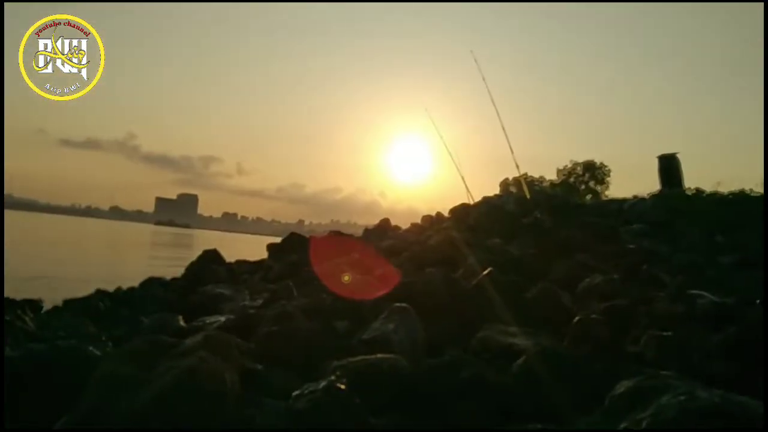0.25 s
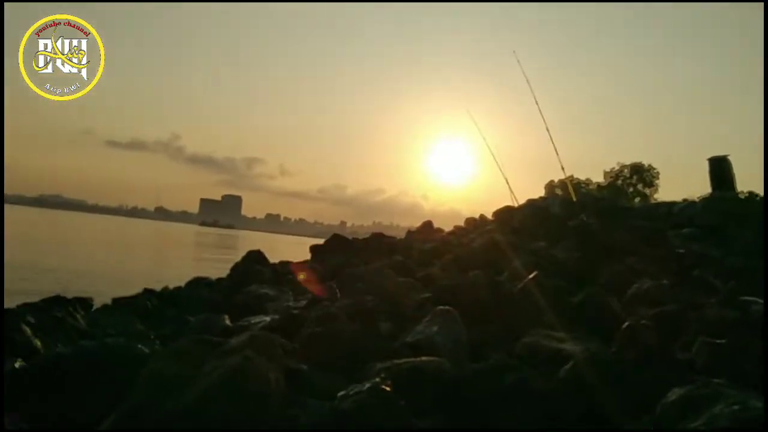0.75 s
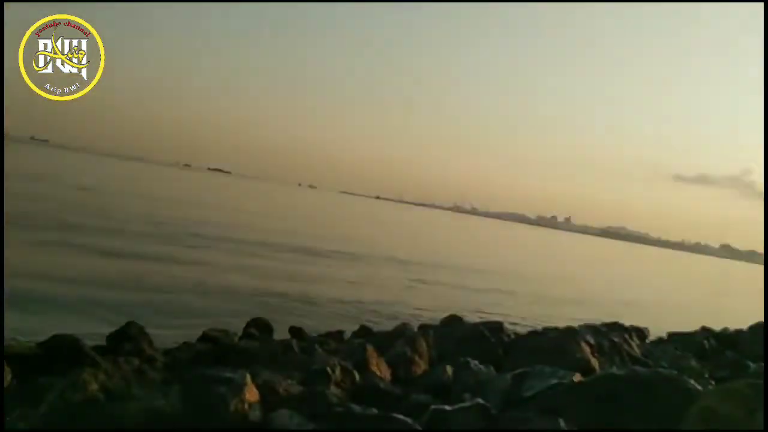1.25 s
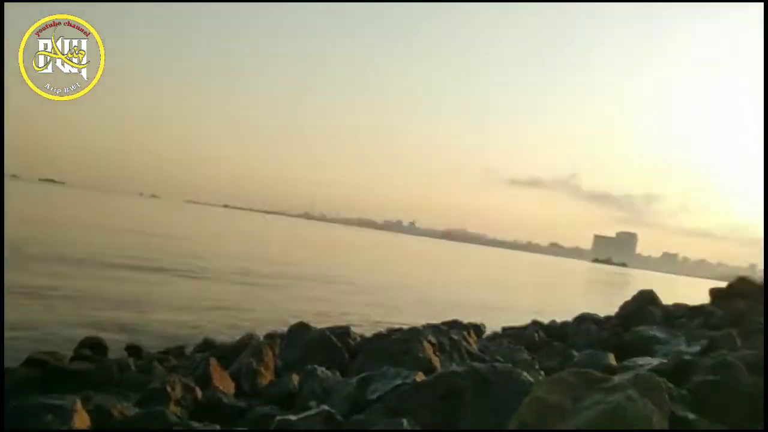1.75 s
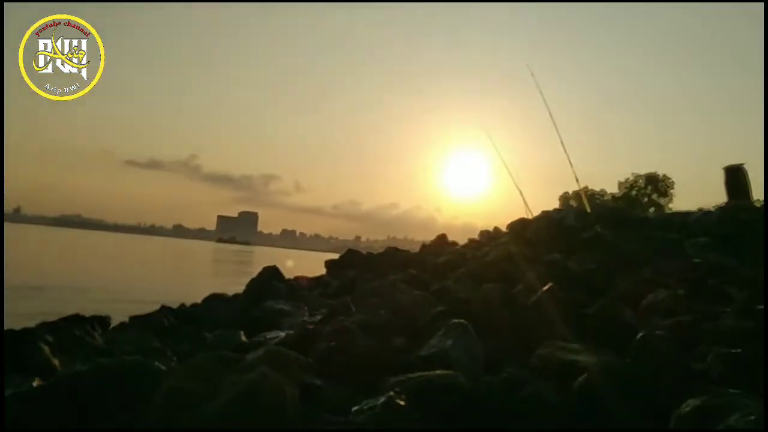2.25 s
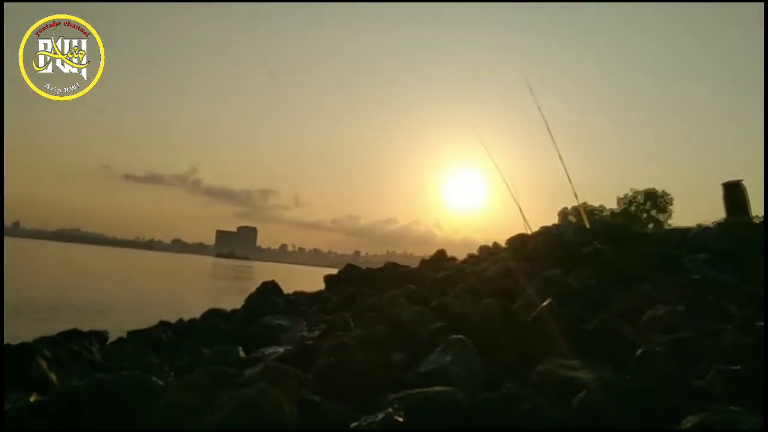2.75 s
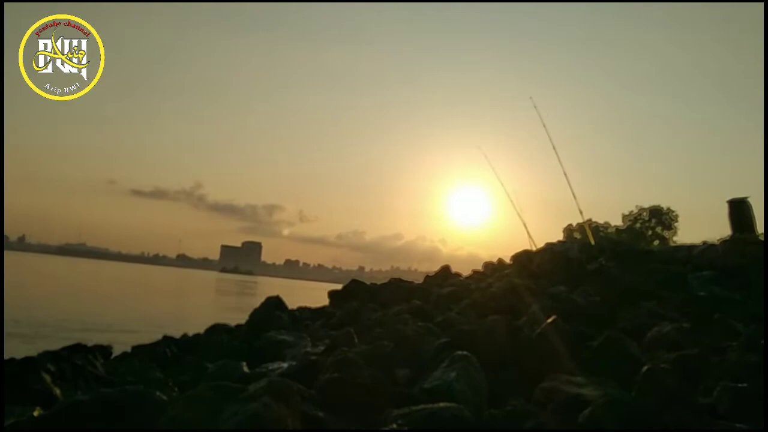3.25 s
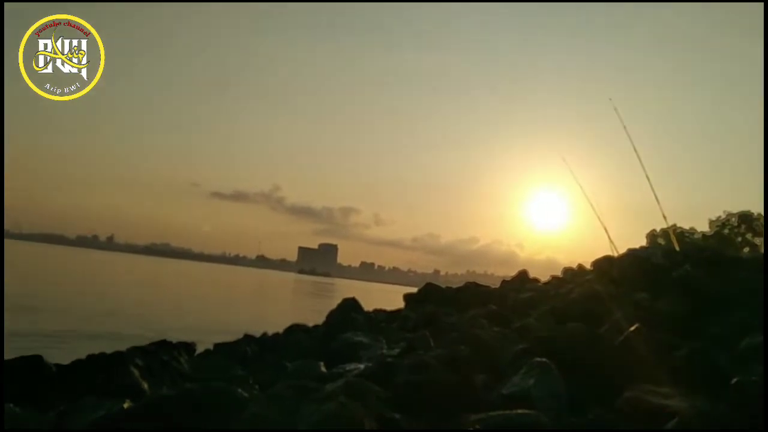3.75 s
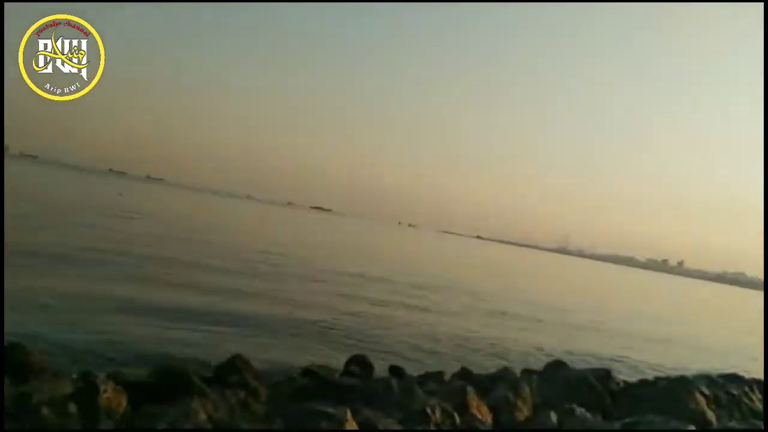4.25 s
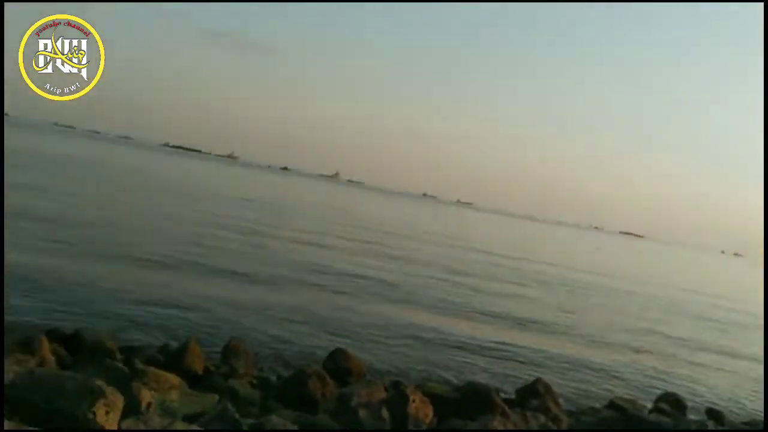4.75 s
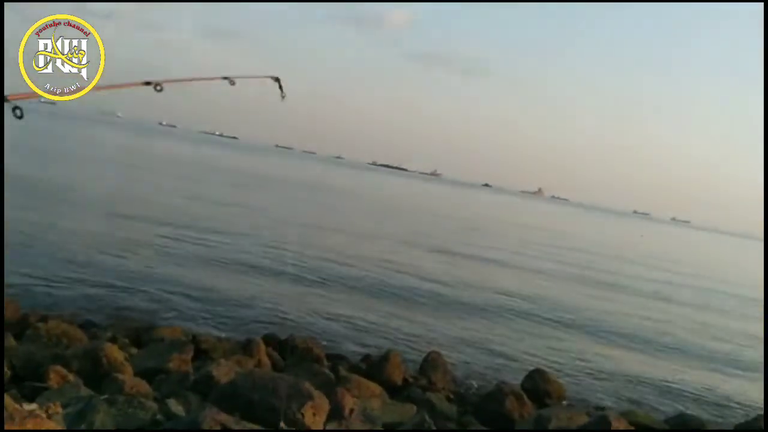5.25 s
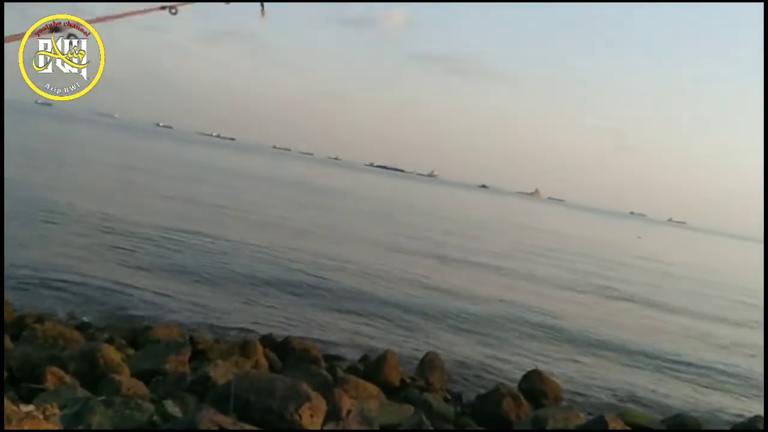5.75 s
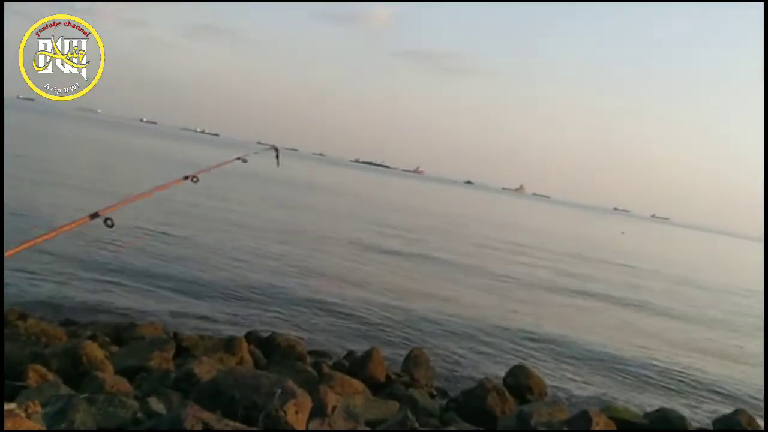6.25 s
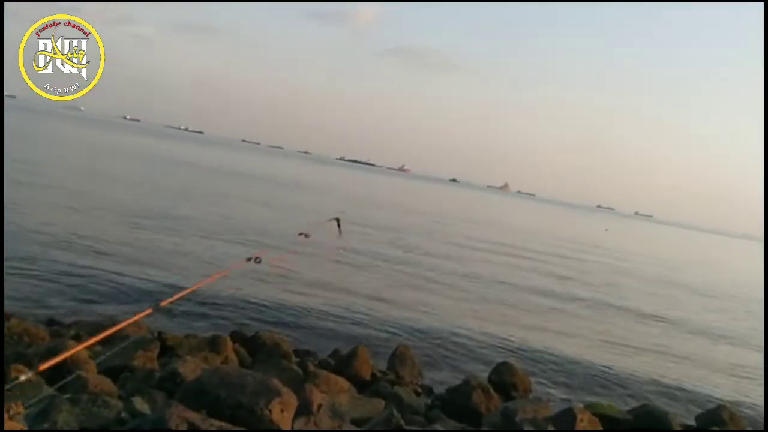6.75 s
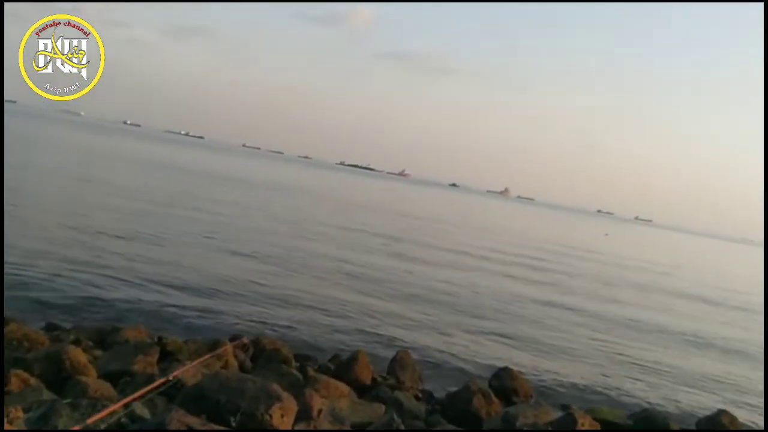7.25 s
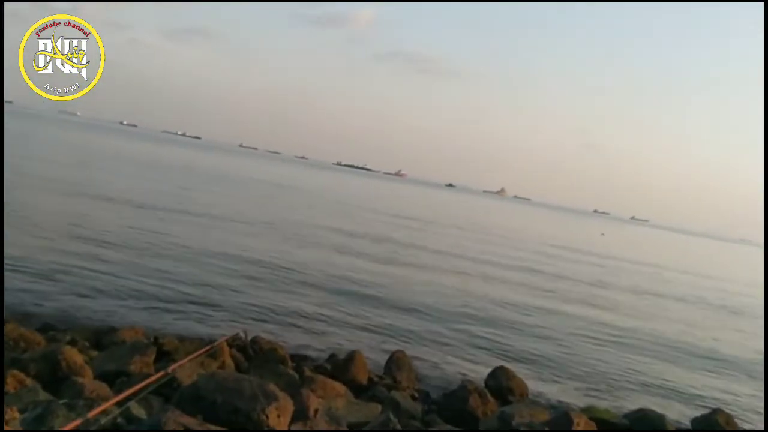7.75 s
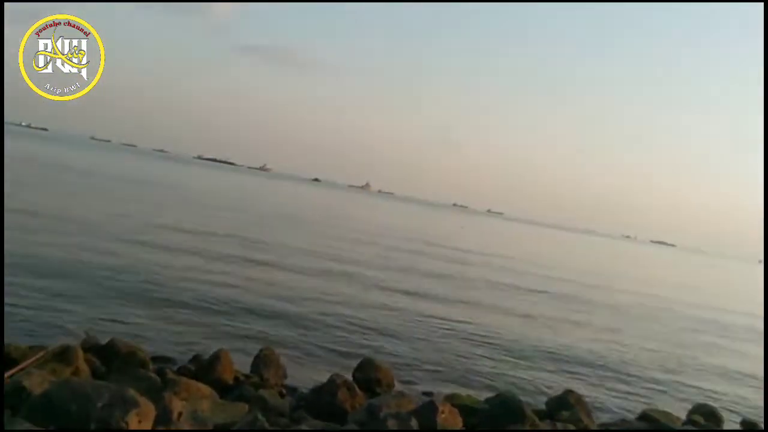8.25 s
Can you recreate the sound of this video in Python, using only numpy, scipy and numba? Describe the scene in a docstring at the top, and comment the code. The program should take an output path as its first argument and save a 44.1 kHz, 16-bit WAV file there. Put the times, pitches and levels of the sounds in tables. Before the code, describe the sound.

Gentle water plops and gurgles between rocks, foam hissing in a stronger surge late on, with soft wind rumble and distant engine hum beneath.

```python
"""Small waves on a boulder shore

Waves slap the stones as decaying bursts of noise and tone, with single air pockets and small spills as ringing bubbles.
Water gulps in the gaps through a moving resonance; trickles and foam are swarms of bubbles over coloured noise.
The boulders add a short, dense echo to all of the water but the foam.
A light breeze rumbles on the microphone as low noise, over ship engines humming far off as two low tones."""
import sys
import numpy as np
from scipy import signal
from scipy.fft import irfft
from scipy.io import wavfile
from scipy.ndimage import uniform_filter1d
from numba import njit

SR = 44100
rng = np.random.default_rng(int(sys.argv[2]) if len(sys.argv) > 2 else 0)


def digitize_waveform(pressure):
    """Quantize a signal to 16-bit integers and store it at the path in sys.argv[1].

    Rows of a 2-D input are taken as channels; values are limited to [-1, 1].
    """
    field = np.atleast_2d(pressure).T
    bounded = np.clip(field, -1, 1)
    quanta = np.round(bounded * 32767).astype(np.int16)
    wavfile.write(sys.argv[1], SR, quanta)


N = 375291
TIME = np.arange(N) / SR


def gain_of(db):
    """Level law: 20 dB is a factor of ten in amplitude."""
    return 10 ** (np.asarray(db) / 20)


def evened(x):
    """Power normalisation: scales to rms 1."""
    return x / np.sqrt(np.mean(x ** 2) + 1e-20)


def curve(rows, index=1):
    """Linear interpolation: one column of a table, joined by straight lines in time."""
    rows = np.asarray(rows)
    return np.interp(TIME, rows[:, 0], rows[:, index])


def add(mix, s, sound):
    """Superposition: sums a sound into the mix at time s."""
    part = mix[max(round(s * SR), 0):][:len(sound)]
    part += sound[:len(part)]


def played(rows, voice):
    """Superposition of events: every row of a table, sounded at its time."""
    out = np.zeros(N)
    for s, *event in rows:
        add(out, s, voice(*event))
    return out


def wander(per_s):
    """Random modulation: chance values, per_s a second, joined by straight lines, at rms 1."""
    knots = rng.standard_normal(4096)
    return evened(np.interp(TIME * per_s, np.arange(len(knots)), knots))


def coloured(x, colour, size=8192):
    """Minimum-phase filtering: shapes the spectrum without ringing ahead of a blow, at rms 1."""
    hz, db = np.transpose(colour)
    # the response falls by 50 dB towards points far beyond both ends
    hz = np.r_[hz[0] / 6, hz, hz[-1] * 6]
    db = np.r_[db[0] - 50, db, db[-1] - 50]
    bins_hz = abs(np.fft.fftfreq(size, 1 / SR))
    shape_db = np.interp(np.log(bins_hz + 1), np.log(hz), db)
    # the Hilbert transform of the log gain gives the minimum phase
    log_response = np.conj(signal.hilbert(np.log(gain_of(shape_db))))
    response = np.exp(log_response)[:size // 2 + 1]
    return evened(signal.oaconvolve(x, irfft(response))[:len(x)])


def resonate(x, hz, width_hz):
    """Heterodyne resonance: shifts the moving pitch to zero, smooths, and shifts back, at rms 1."""
    turn = np.exp(2j * np.pi * np.cumsum(hz) / SR)
    r = np.exp(-np.pi * width_hz / SR)
    smoothed = signal.lfilter([1], [1, -2 * r, r * r], x / turn)
    return evened((turn * smoothed).real)


@njit
def ring_bubbles(count, births, steps, lives, sizes, rise):
    """Bubble oscillation: each air pocket rings, dies over its life, and rises in pitch near the surface."""
    # steps: cycles per sample; lives: decay constants in samples; rise: share of the pitch per life
    out = np.zeros(count)
    for k in range(len(births)):
        swing = sizes[k] + 0j
        turn = np.exp(2j * np.pi * steps[k] - 1 / lives[k])
        quicken = np.exp(2j * np.pi * steps[k] * rise / lives[k])
        for i in range(min(int(4 * lives[k]), count - births[k])):
            # the first half cycle fades in
            out[births[k] + i] += swing.imag * min(2 * steps[k] * i, 1.)
            swing *= turn
            turn *= quicken
    return out


def bubbles(lo_hz, hi_hz, per_s, cycles, rise, spread_db):
    """Random births: a swarm with pitches even on a log scale, many bubbles faint and a few strong."""
    births = np.flatnonzero(rng.random(N) < per_s / SR)
    pitch, damping, chance = rng.random((N, 3), dtype=np.float32)[births].T.astype(float)
    hz = lo_hz * (hi_hz / lo_hz) ** pitch
    lives = cycles * (.5 + damping) * SR / hz
    excess_db = spread_db * np.minimum(-np.log(1 - chance), 4)
    sizes = gain_of(excess_db) * np.sqrt(hz / lives)
    swarm = ring_bubbles(N, births, hz / SR, lives, sizes, float(rise))
    # a denser swarm gains in number but not in power
    return evened(swarm / np.sqrt(per_s))


def water(grains, colour, rush_db, flicker_db, flicker_per_s):
    """Dense superposition: bubbles over the noise of countless tiny ones, arriving in spurts."""
    mix = grains + gain_of(rush_db) * rng.standard_normal(N)
    spurts = gain_of(flicker_db * wander(flicker_per_s))
    return evened(coloured(mix, colour) * spurts)


def patchy(x, depth_db, size=512):
    """Time-frequency modulation: water finds ever new paths, so bands of its sound come and go."""
    z = signal.stft(x, nperseg=size)[2]
    field = uniform_filter1d(rng.standard_normal(z.shape), size=9, axis=0)
    field = evened(uniform_filter1d(field, size=8, axis=1))
    return evened(signal.istft(z * gain_of(depth_db * field), nperseg=size)[1][:N])


def swells(events, rise_s, fall_db_per_s):
    """Power addition: each push of water rises, holds for its length, and drains away."""
    power = np.zeros(N)
    for start, length, level_db in events:
        age = TIME - start
        fall_db = fall_db_per_s * np.maximum(age - length, 0)
        power += (np.clip(age / rise_s, 0, 1) * gain_of(level_db - fall_db)) ** 2
    return power


# wind noise spectrum: (frequency [Hz], level per Hz [dB])
BREEZE_SPECTRUM = [(15, -30), (25, -14), (40, -13.5), (55, -12), (72, 0.5), (90, 4.5), (115, -3),
                   (150, -3.5), (180, -15), (230, -24), (320, -36), (600, -46.5)]
# slow level of the wind noise: (time [s], level [dB])
BREEZE_LEVEL = [(0.0, -42.5), (0.3, -54.5), (0.38, -39), (0.47, -50), (0.85, -60.5), (1.2, -48.5),
                (2.0, -48), (2.5, -48), (2.8, -61.5), (3.02, -56), (3.15, -63.5), (3.55, -49.5),
                (4.05, -53.5), (4.25, -51), (4.4, -63), (4.94, -50), (5.16, -66), (5.28, -45), (5.58, -63),
                (5.75, -46), (5.9, -54), (6.64, -47), (7.35, -63), (7.67, -53), (7.82, -59), (7.97, -51),
                (8.1, -61.5), (8.3, -51)]


def breeze():
    """Wind noise: low noise evened over about 80 ms, so that the gusts alone set its slow level."""
    wind = coloured(rng.standard_normal(N), BREEZE_SPECTRUM)
    wind /= np.sqrt(uniform_filter1d(wind ** 2, size=3500))
    return gain_of(curve(BREEZE_LEVEL)) * wind


# partials of the engine hum: (frequency [Hz], relative level [dB])
HUM_PARTIALS = [(74.8, -4), (149.6, -12)]
# swelling and fading of the hum: (time [s], level [dB])
HUM_SWELL = [(0.0, -43.5), (0.5, -50), (0.85, -66), (1.2, -46), (2.25, -42), (3.05, -72), (3.6, -47.5),
             (4.5, -59), (6.6, -47.5), (7.3, -69.5), (8.5, -56)]


def engine_hum():
    """Harmonic tones: two partials share a slow pitch drift, while each flutters in level."""
    drift = np.cumsum(.006 * wander(5)) / SR  # 0.6 % of the pitch, rms
    hum = np.zeros(N)
    for hz, db in HUM_PARTIALS:
        level = gain_of(db - 0.5 + 3.6 * wander(7.0))
        hum += level * np.sqrt(2) * np.sin(2 * np.pi * hz * (TIME + drift))
    return gain_of(curve(HUM_SWELL)) * hum


# small crests breaking into foam: (start [s], length [s], level [dB])
BREAKING_CRESTS = [(0.06, 0.025, -52), (1.16, 0.082, -60.5), (1.44, 0.052, -50.5), (4.88, 0.14, -46),
                   (5.85, 0.066, -51.5), (6.0, 0.045, -40), (6.12, 0.027, -38), (6.42, 0.14, -43),
                   (7.11, 0.036, -47), (7.3, 0.044, -45.5), (7.82, 0.056, -50), (7.96, 0.074, -48.5)]
CREST_RISE_S, CREST_FALL_DB_PER_S = 0.02, 188.5
SWAY_DB, SWAY_PER_S = 0.5, 12  # ripples make a thin wash come and go


def with_crests(wash_db, crest_db):
    """Power addition of levels: the slow wash in dB with the breaking crests on top."""
    crests = swells(BREAKING_CRESTS, CREST_RISE_S, CREST_FALL_DB_PER_S)
    thin = 1 - gain_of(wash_db - wash_db.max())
    wash = gain_of(wash_db + SWAY_DB * thin * wander(SWAY_PER_S))
    return 10 * np.log10(wash ** 2 + gain_of(crest_db) ** 2 * crests)


def spatter(per_s, decay, spread_db):
    """Shot noise: falling drops at chance times, each a decaying pulse (decay in s) of one envelope."""
    excess_db = spread_db * np.minimum(rng.exponential(1, N), 2.5)
    drops = (rng.random(N) < per_s / SR) * gain_of(excess_db)
    return evened(signal.lfilter([1], [1, -np.exp(-1 / (decay * SR))], drops))


DRIPS_PER_S, DRIPS_DB = 26, -7  # level relative to thin foam


def drips():
    """Impact noise: single drops land on wet stone, each a dry tick over the whole treble."""
    excess_db = 4 * np.minimum(rng.exponential(1, N), 2.6)
    landings = (rng.random(N) < DRIPS_PER_S / SR) * gain_of(excess_db)
    burst = signal.lfilter([1], [1, -np.exp(-1 / (.0005 * SR))], landings)  # 0.5 ms decay
    return coloured(burst * rng.standard_normal(N), FOAM_SPECTRUM)


# slow wash of the swell over the stones: (time [s], foam level [dB], trickle level [dB])
SWELL_WASH = [(0.0, -57, -66), (0.2, -53.5, -58.5), (0.55, -61, -60.5), (0.8, -74, -60), (0.93, -69.5, -71),
              (1.08, -63.5, -69), (1.38, -60.5, -67.5), (1.75, -53.5, -55.5), (2.15, -49.5, -55),
              (2.47, -58.5, -66), (2.78, -66, -66), (2.88, -58.5, -64.5), (3.08, -65.5, -60),
              (3.28, -60, -61.5), (3.58, -62.5, -66), (3.95, -59, -57), (4.45, -53.5, -59.5),
              (4.7, -53.5, -56.5), (5.25, -49.5, -54), (5.7, -51.5, -53), (5.96, -62, -58),
              (6.3, -45, -55.5), (6.63, -34, -45.5), (6.9, -43.5, -53.5), (7.19, -41, -50.5),
              (7.26, -49, -56.5), (7.48, -52.5, -55.5), (7.62, -58, -63), (8.05, -51.5, -50.5),
              (8.25, -59, -57), (8.5, -78, -67)]
# foam spectrum: (frequency [Hz], level per Hz [dB])
FOAM_SPECTRUM = [(1200, -5.5), (2400, -3), (3400, -2), (5000, -3), (6700, -2.5), (7900, 2.5), (8700, -5),
                 (10000, -10.5), (13000, -19), (16000, -15)]


def foam():
    """Bubble bursting: separate ticks when thin, a bright dense hiss as a wave breaks."""
    level_db = with_crests(curve(SWELL_WASH), crest_db=2.5)
    surge = gain_of(level_db - level_db.max())
    ticks = bubbles(1800, 14000, per_s=1400 + 14000 * surge, cycles=4, rise=.01, spread_db=3)
    fizz = water(ticks, FOAM_SPECTRUM, rush_db=-3, flicker_db=1.1, flicker_per_s=70)
    # single drops stand out only while the foam is thin
    share = 0.3 * (1 - surge) ** 2
    fizz *= np.sqrt(1 - share + share * spatter(per_s=64, decay=0.006, spread_db=2.5) ** 2)
    fizz = patchy(fizz + gain_of(DRIPS_DB) * (1 - surge) ** 4 * drips(), depth_db=1.6)
    # the top treble above 8.7 kHz dulls as the level falls
    below_top = signal.sosfiltfilt(signal.butter(12, 8700, fs=SR, output="sos"), fizz)
    top_gain = np.clip((level_db + 67) / 12.5, .35, 1)
    return gain_of(level_db + 1.23) * (below_top + top_gain * (fizz - below_top))


# trickle spectrum: (frequency [Hz], level per Hz [dB])
TRICKLE_SPECTRUM = [(400, -23.5), (600, -9.5), (750, 7), (1100, 6.5), (1600, 5.5), (2300, 1.5), (3200, -5),
                    (5000, -37.5)]
RUNOFF_DB = -9  # crests in the trickle, relative to their table


def trickle():
    """Bubble entrainment: runoff plinks with more bubbles, and larger ones, as the flow grows."""
    level_db = with_crests(curve(SWELL_WASH, index=2), crest_db=RUNOFF_DB)
    flow = gain_of(level_db - level_db.max())
    plinks = bubbles(620, 3800, per_s=260 + 4500 * flow, cycles=7, rise=.04, spread_db=2.7)
    run = water(plinks, TRICKLE_SPECTRUM, rush_db=-8, flicker_db=1.3, flicker_per_s=30)
    run = patchy(run, depth_db=1.5)
    large = signal.sosfiltfilt(signal.butter(6, 950, fs=SR, output="sos"), run)
    # a weak flow traps few large bubbles
    lacking = np.clip(0.85 - 2.4 * flow + 0.29 * wander(4.9), 0, .93)
    return gain_of(level_db - 0.16) * (run - lacking * large)


# gurgle spectrum: (frequency [Hz], level per Hz [dB])
GURGLE_SPECTRUM = [(130, -5), (230, 2), (350, -7), (480, -1), (680, 0), (950, -54.5)]
# the gap that the water fills: (time [s], pitch of its air [Hz])
GAP_PITCH = [(1.5, 470), (1.7, 386), (1.95, 506), (2.3, 485), (2.6, 630), (3.6, 660), (4.8, 454),
             (5.62, 342), (5.74, 630), (6.15, 417), (6.77, 356), (7.1, 458), (8.05, 397)]
# water filling a gap between boulders: (start [s], length [s], level [dB])
GAP_GULPS = [(1.46, 0.22, -65.5), (1.66, 0.046, -48.5), (1.8, 0.25, -57), (2.11, 0.13, -54),
             (2.86, 0.057, -66), (4.9, 0.11, -44.5), (5.24, 0.45, -58.5), (5.72, 0.072, -60.5),
             (6.02, 0.041, -48.5), (6.13, 0.029, -44), (6.2, 0.2, -62), (6.41, 0.2, -48),
             (6.64, 0.11, -43.5), (6.83, 0.093, -57.5), (7.08, 0.097, -48.5), (7.982, 0.03, -40),
             (8.11, 0.048, -48)]
GULP_RISE_S, GULP_FALL_DB_PER_S = 0.0034, 151
SLOSH_DB = -19.5  # gurgle between gulps, relative to the slow trickle wash


def gurgle():
    """Cavity resonance: large air pockets gulp between the boulders, and the gap that holds them rings."""
    pockets = bubbles(200, 750, per_s=700, cycles=6, rise=.04, spread_db=1.3)
    churn = water(pockets, GURGLE_SPECTRUM, rush_db=-4, flicker_db=1.0, flicker_per_s=25)
    hollow = evened(resonate(churn, curve(GAP_PITCH), width_hz=172) + 1.32 * churn)
    slosh = gain_of(curve(SWELL_WASH, index=2) + SLOSH_DB)
    gulps = swells(GAP_GULPS, GULP_RISE_S, GULP_FALL_DB_PER_S)
    return np.sqrt(slosh ** 2 + gulps) * hollow


# small spills over single stones: (start [s], length [s], level [dB], pitch [Hz])
STONE_SPILLS = [(0.6, 0.049, -65, 786), (0.73, 0.038, -64, 790), (3.185, 0.04, -55.5, 1330),
                (3.84, 0.1, -60.5, 877), (4.14, 0.073, -63.5, 764), (5.595, 0.044, -55.5, 706),
                (7.2, 0.02, -43, 960), (7.808, 0.024, -49, 930), (8.11, 0.031, -45, 1100)]
SPILL_SCATTER, SPILL_CYCLES = 0.151, 7  # spread of the bubbles' log pitch, and their life in cycles


def spill(length, level_db, hz, count=36):
    """Bubble train: a tongue of water tips over a stone in a short run of bubbles of about one size."""
    chance, scatter = rng.random((2, count)), rng.standard_normal(count)
    place = (np.arange(count) + chance[0]) / count
    births = (place * min(length, .25) * SR).astype(int)
    steps = hz * np.exp(SPILL_SCATTER * scatter) / SR
    sizes = np.sin(np.pi * place) ** .5 * (.5 + chance[1])
    run = ring_bubbles(SR // 2, births, steps, SPILL_CYCLES / steps, sizes, .04)
    # the level holds over the spill's own length
    return gain_of(level_db) * evened(run) * np.sqrt(length * SR / len(run))


# single large air pockets: (time [s], ring time [s], level [dB], pitch [Hz])
AIR_POCKETS = [(1.492, 0.0057, -55.5, 472), (1.651, 0.0048, -37, 715), (3.081, 0.0025, -52, 995),
               (3.22, .011, -51, 251), (5.234, 0.0077, -55.5, 450), (5.333, 0.014, -53, 364),
               (5.528, 0.009, -46.5, 343), (5.604, 0.011, -46, 275), (6.441, 0.0084, -35.5, 276),
               (6.681, 0.0073, -35, 328), (6.818, 0.0072, -43.5, 467), (7.742, 0.013, -54, 293),
               (8.026, 0.011, -35, 293)]
PLOP_RISE, PLOP_WOBBLE = 0.03, 0.094  # shares of the pitch


def plop(ring_s, level_db, hz):
    """Damped oscillation: one large air pocket swells softly, wobbles and dies, rising a little in pitch."""
    t = np.arange(8192) / SR
    age = t / max(ring_s, .001)
    wobble = np.interp(age, np.arange(256), rng.standard_normal(256))
    pitch = hz * (1 + PLOP_RISE * np.tanh((age - 1) / 2) + PLOP_WOBBLE * wobble)
    swell = age * np.exp(1 - age)
    return gain_of(level_db) * np.sqrt(2) * swell * np.sin(2 * np.pi * np.cumsum(pitch) / SR)


# water striking stone, the spray relative to the level:
# (time [s], length [s], level [dB], pitch of the trapped air [Hz], spray [dB])
STONE_SLAPS = [(0.035, 0.0018, -45, 3430, 0), (0.603, 0.024, -53.5, 1430, -3.5),
               (0.798, 0.0032, -52, 1790, -26.5), (1.158, 0.0031, -51, 1850, 0),
               (1.315, 0.0016, -56.5, 5300, 7), (1.651, 0.0073, -40.5, 1310, 0.5),
               (1.651, 0.0017, -35.5, 4300, -12), (1.668, 0.013, -45, 507, -15),
               (1.69, 0.006, -35.5, 420, -25), (1.691, 0.003, -40.5, 2400, -19),
               (1.788, 0.0095, -41.5, 385, -21), (2.145, 0.004, -46.5, 2250, 2),
               (3.49, 0.0025, -45.5, 1750, 1.5), (3.963, 0.0057, -46.5, 2250, -0.5),
               (4.792, 0.0056, -42, 2260, -28), (4.891, 0.0038, -37.5, 2220, -29),
               (4.909, 0.011, -30, 326, -10), (4.934, 0.028, -41, 182, 1.5), (4.976, 0.014, -34, 314, -11),
               (4.999, 0.018, -38, 240, -10), (5.04, 0.04, -47.5, 263, -4), (5.451, 0.002, -47, 1010, 1),
               (6.004, 0.04, -47.5, 764, 2), (6.123, 0.039, -39.5, 236, 0), (6.148, 0.021, -38, 2630, -0.5),
               (6.245, 0.0081, -36, 396, -4), (6.407, 0.0031, -24, 940, -33),
               (6.418, 0.0048, -35, 467, -26), (6.442, 0.0087, -33, 467, -17),
               (6.644, 0.0086, -33.5, 990, -3), (6.67, 0.0037, -33, 720, -8), (6.684, 0.014, -42, 510, -3),
               (6.742, 0.0055, -23.5, 970, -10.5), (6.747, 0.009, -37.5, 466, -9),
               (7.092, 0.014, -43.5, 880, -2), (7.198, 0.0056, -30.5, 2240, 2),
               (7.777, 0.0063, -42.5, 2910, -1), (7.781, 0.0027, -32, 1380, -10),
               (7.815, 0.028, -48, 480, -3), (8.0, 0.0061, -38, 600, -4), (8.008, 0.0037, -31, 1080, 2),
               (8.019, 0.006, -28, 1150, -11), (8.029, 0.0041, -28.5, 860, -5),
               (8.121, 0.0051, -40.5, 2870, 3.5), (8.154, 0.0042, -28, 4000, -30)]


def slap(length, level_db, hz, spray_db):
    """Impact excitation: a sheet of water hits stone, the trapped air rings and collapses, and spray flies."""
    t = np.arange(8192) / SR
    length = max(length, .002)
    attack = 1 - np.exp(-t / (0.05 * length))
    collapse = np.exp(-np.maximum(t - 0.64 * length, 0) / (0.68 * length))
    blow = attack * collapse
    churn, drops = rng.standard_normal((2, len(t))) * blow
    # both spectra: (frequency [Hz], level per Hz [dB])
    pocket = [(hz / 4, -30), (hz * 0.43, -7), (hz, 0), (hz * 1.21, -6), (min(hz * 4, 10500), -27)]
    spray_colour = [(hz / 2, -20), (min(hz * 1.46, 6000), 0), (6500, -7), (7800, -4), (10000, -15), (16000, -28)]
    ring = np.sin(2 * np.pi * hz * t) * blow
    # long slaps are mostly churn
    clean = 0.35 * np.exp(-length / 0.028)
    body = evened(coloured(churn, pocket) + clean * evened(ring))
    spray = coloured(drops, spray_colour)
    return gain_of(level_db + 0.06) * np.sqrt(length / t[-1]) * (body + gain_of(spray_db) * spray)


def rocks(x, t60, wet_db):
    """Diffuse reflection: nearby boulders scatter a dense echo that falls 60 dB in t60 seconds."""
    t = np.arange(SR // 4) / SR
    tail = rng.standard_normal(len(t)) * gain_of(-60 * t / t60)
    tail *= t > .003  # the first echo arrives after 3 ms
    return x + gain_of(wet_db) * signal.oaconvolve(x, tail / np.linalg.norm(tail))[:N]


def scene():
    """Superposition: the water among the rocks, over breeze and hum."""
    rumble = breeze() + engine_hum()
    splashes = played(STONE_SPILLS, spill) + played(AIR_POCKETS, plop) + played(STONE_SLAPS, slap)
    shore = rocks(splashes + trickle() + gurgle(), t60=0.047, wet_db=-9.5) + foam()
    return (shore + rumble)[None]


EDGE_HZ = 15750


def record(dry):
    """Band limiting: the recorder's linear-phase low-pass."""
    low_pass = signal.firwin(511, EDGE_HZ, window=("kaiser", 9), fs=SR)
    return signal.oaconvolve(dry, low_pass[None], "same")


dry = scene()
out = record(dry)
digitize_waveform(out)
```